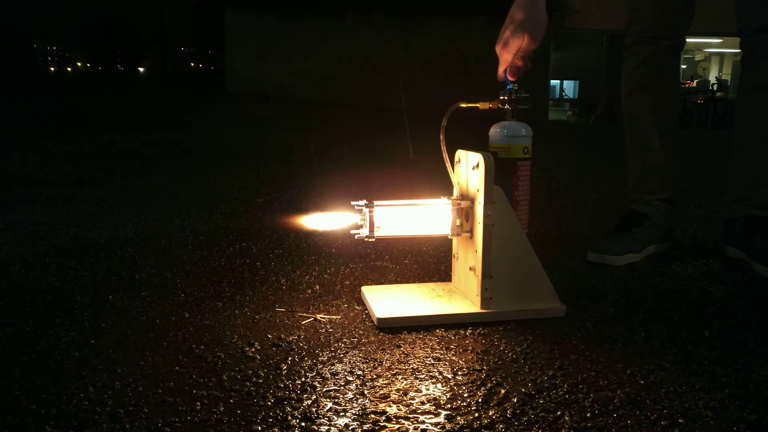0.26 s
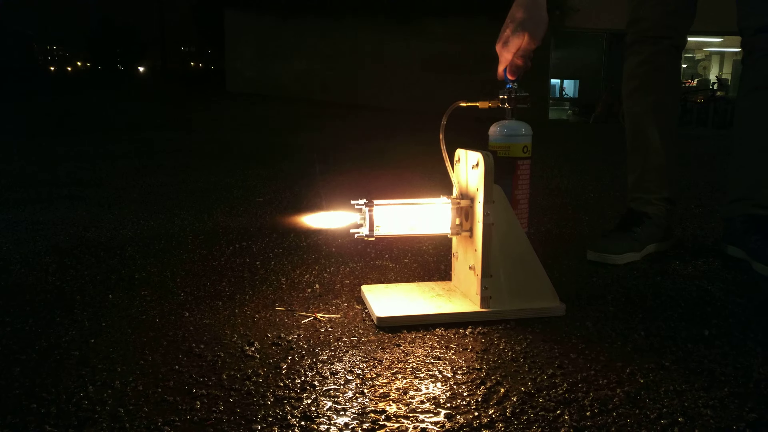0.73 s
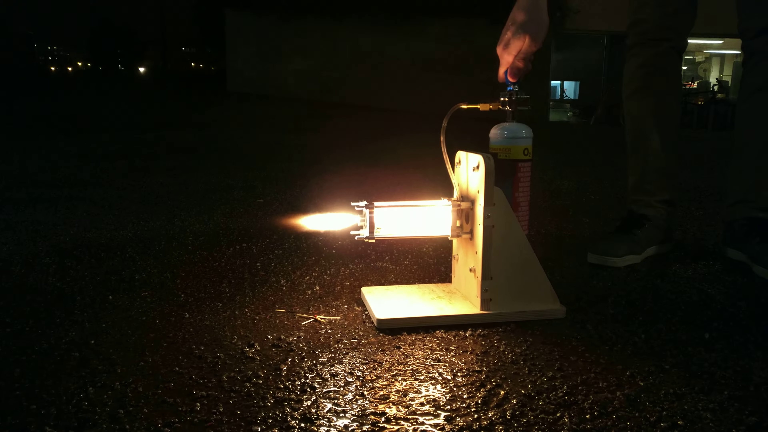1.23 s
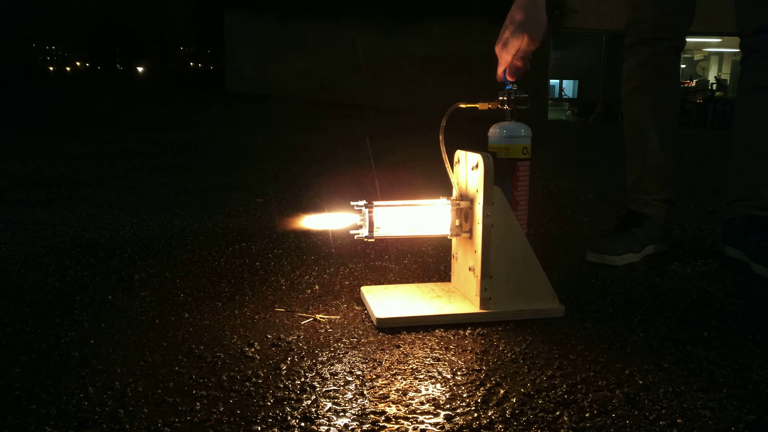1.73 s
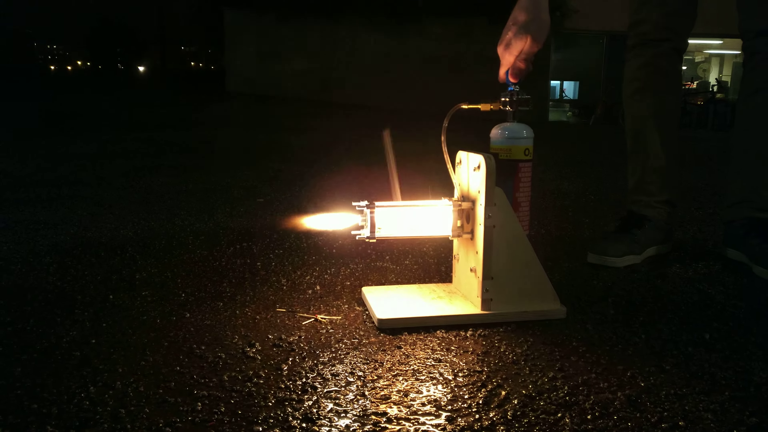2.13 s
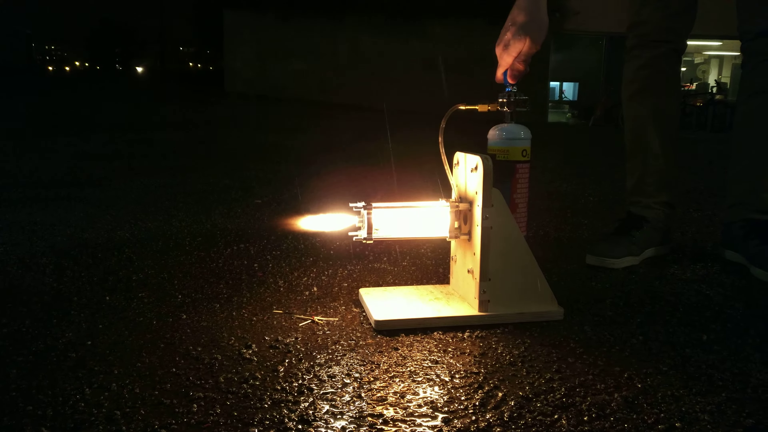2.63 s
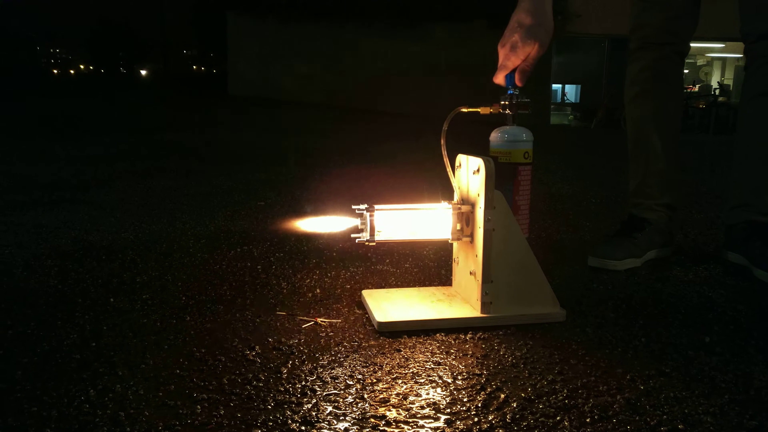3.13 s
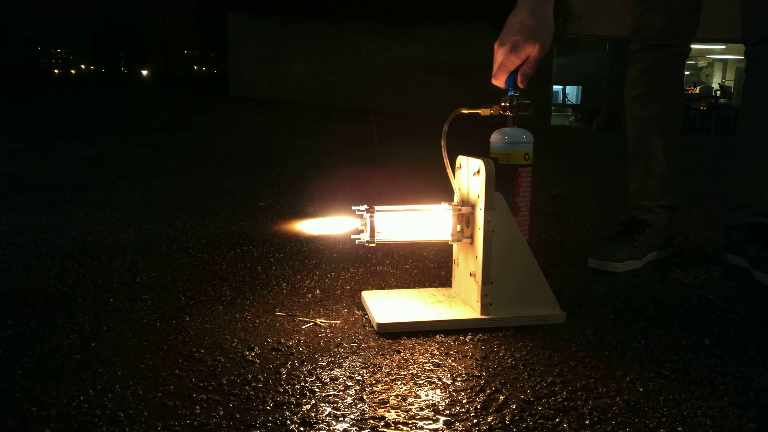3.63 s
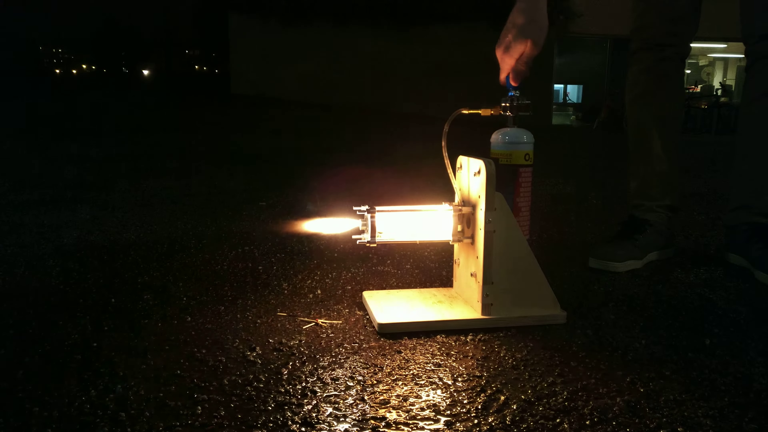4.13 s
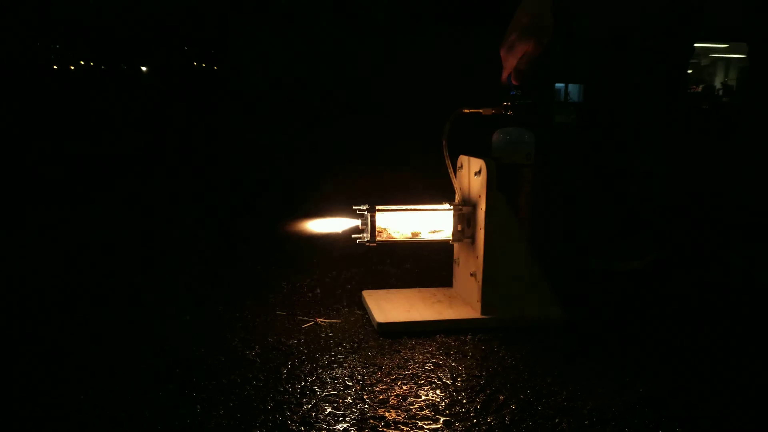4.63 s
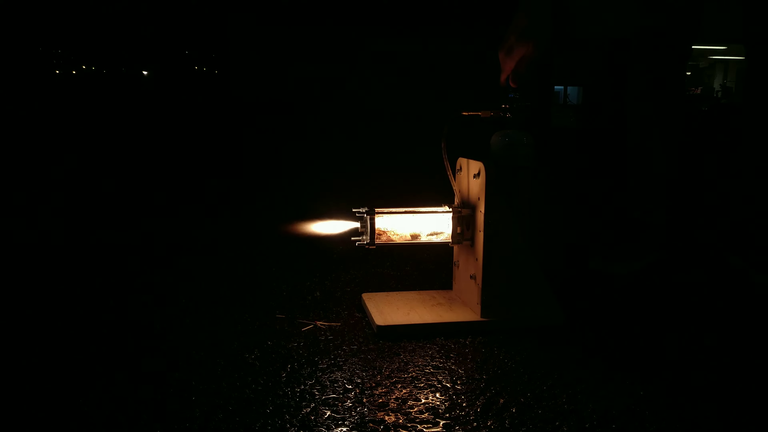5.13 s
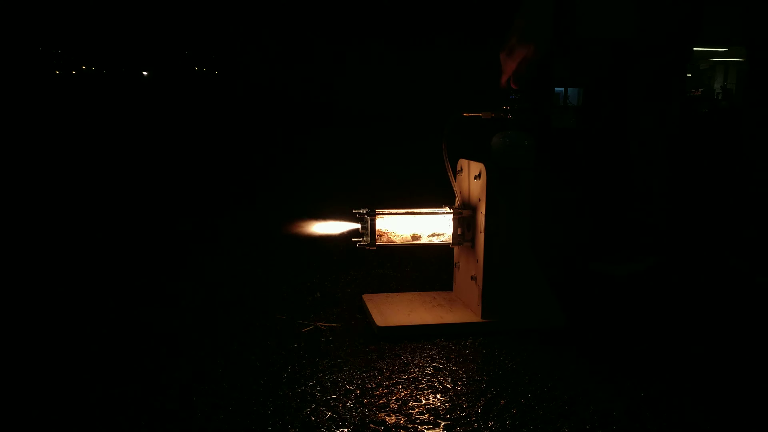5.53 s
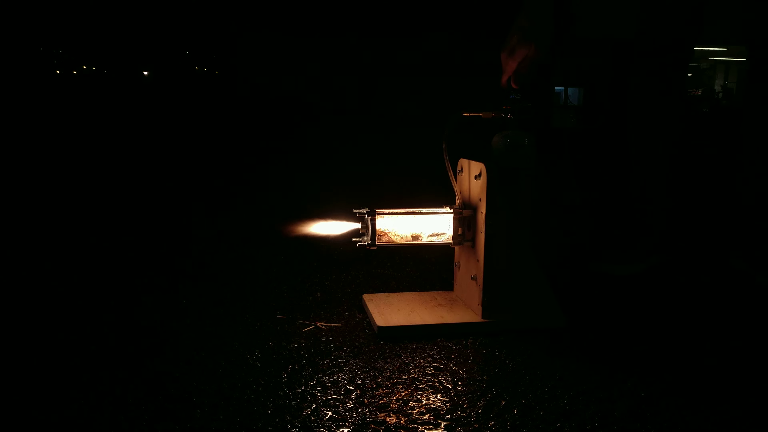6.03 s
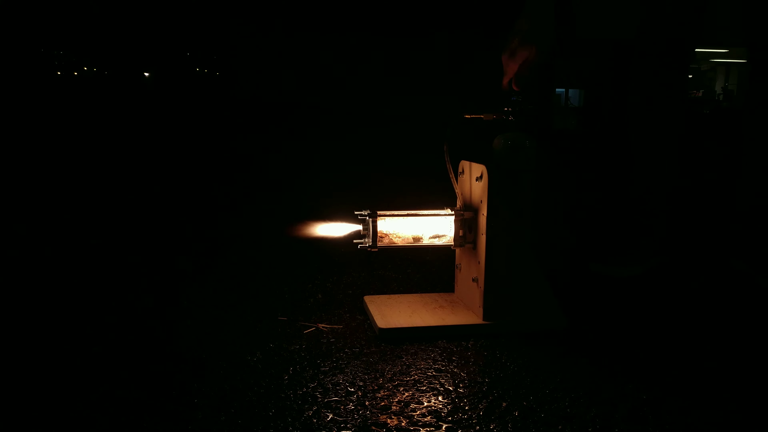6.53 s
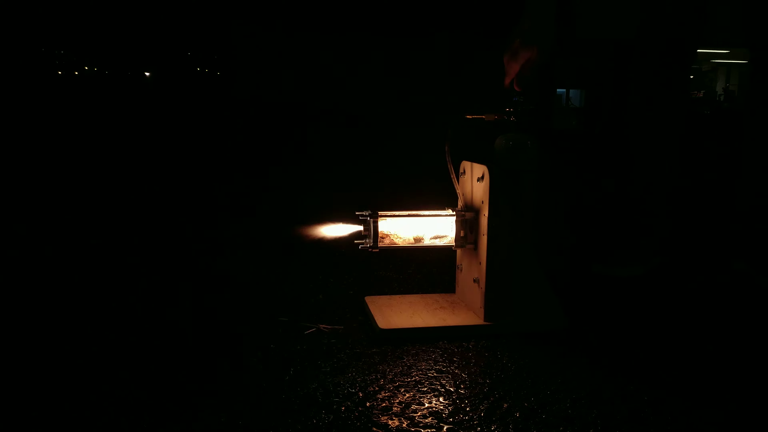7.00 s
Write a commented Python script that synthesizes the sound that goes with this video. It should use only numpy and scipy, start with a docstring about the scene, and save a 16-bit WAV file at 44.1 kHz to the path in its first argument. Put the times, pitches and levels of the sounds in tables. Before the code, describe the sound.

Close, loud, harsh hiss and flame roar from a small nozzle, with sharp thumping pops growing frequent and brief flame dropouts near the end.

```python
"""Gas hiss and flame roar come first; then the flame pops, more and more often, and briefly blows out.
A small hybrid rocket motor burns on a stand over wet asphalt, close to a stereo microphone.
Hiss, roar and a shrill band are shaped noise; pops are pressure spikes with puffs and low thumps.
The ground returns a late copy of the jet, which cuts evenly spaced notches into it.
A low machine hum lies behind."""
import sys
import numpy as np
from scipy import signal
from scipy.fft import rfft, irfft
from scipy.io import wavfile
from scipy.ndimage import uniform_filter1d, map_coordinates

SR = 44100
rng = np.random.default_rng(int(sys.argv[2]) if len(sys.argv) > 2 else 0)


def output_pcm(signal):
    """Save a mono or channel-first signal as 16-bit PCM at the path in sys.argv[1].

    Samples are clipped to [-1, 1] before scaling.
    """
    pcm = np.clip(np.atleast_2d(signal).T, -1, 1) * 32767
    wavfile.write(sys.argv[1], SR, np.round(pcm).astype(np.int16))


N = 320166
TIME = np.arange(N) / SR  # s
FREQ = np.maximum(np.arange(N // 2 + 1) * SR / N, 1)  # Hz

# a machine hums somewhere nearby: (multiple of its speed, mean level [dB rms])
HUM_TONES = [(1, -42.5), (2, -45), (3, -45.5)]
HUM_HZ = 48.5
# narrow peaks and dips in the jet's colour:
# (centre [Hz], width before a lower limit [Hz], left [dB], right [dB])
JET_PEAKS_AND_DIPS = [(388, 103, -9.5, -7), (612, 78, -3, -7.5), (1084, 99, 4.5, 5), (1749, 102, -7.5, 1),
                      (1980, 120, -7, -12.5), (2235, 170, 5.5, 3.5), (2404, 100, -7, -1.5),
                      (2543, 88, 4.5, 2.5), (3186, 78, -8.5, -6.5), (3450, 150, 1.5, 5.5),
                      (3943, 210, -6.5, -15), (4070, 150, 6, 6.5), (4840, 190, 4.5, -6),
                      (5180, 100, -9.5, -6), (5350, 110, 8.5, 6.5), (5506, 100, -12.5, -11),
                      (5646, 110, 7.5, 6.5), (6530, 110, -7.5, -14), (6640, 140, 5, 3.5),
                      (6885, 173, -9.5, -8), (7020, 130, 6, 8.5), (7380, 260, -26, -35),
                      (9200, 380, -11.5, 5.5)]
# the echo's path shifts as the flame wanders:
# (time [s], mean first notch [Hz], echo's share of the direct sound [0-1])
GROUND_PATH = [(0, 1490, .85), (.4, 1522, .88), (5, 1508, .86), (5.95, 1486, .82), (6.04, 1434, .72),
               (6.8, 1440, .72), (7.0, 1482, .76)]
# the notches waver: typical share of their frequency, changes per s
NOTCH_WAVER, NOTCH_WAVER_RATE = .005, 14
# how alike left and right are: (frequency [Hz], correlation [0-1], phase by which left leads [rad])
STEREO_LIKENESS = [(99, 0.92, 0), (616, 0.98, 0.57), (870, 0.64, 0), (1190, 0.86, -0.9), (1500, 0, -1.5),
                   (1710, 0.85, -3), (1835, 1, -3), (2110, 1, -3), (2276, 0.6, -2), (3000, 0.86, -1.3),
                   (3500, 0.52, -1.25), (4670, 0.45, -2), (5000, 0.56, -3.5), (6520, 0.2, -4),
                   (7220, 0.87, -6), (7000, 1, -1), (7670, 1, 3), (7930, 1, -6), (8570, 0.9, -6),
                   (9200, 0, -5), (10800, 0.5, -6), (13200, 0.3, -5), (14300, 1, -8.5)]
# gas hiss before these peaks and dips and gain: (frequency [Hz], left [dB per Hz], right [dB per Hz])
HISS_SPECTRUM = [(300.0, -67, -67), (1410, -68, -68.5), (2580, -72.5, -68.5), (4700, -58, -74.5),
                 (5730, -65, -74), (7530, -65, -64), (8250, -65.5, -67.5), (9830, -62.5, -62),
                 (10260, -56, -57.5), (11100, -63, -51.5), (12400, -68, -55), (13400, -55, -50),
                 (14900, -75, -57), (16200, -63, -51.5)]
HISS_LOW_HZ = 1500
# flame roar before these peaks and dips, bass blending and gain:
# (frequency [Hz], left [dB per Hz], right [dB per Hz])
ROAR_SPECTRUM = [(99, -62.5, -62), (308, -60, -62.5), (547, -57.5, -61.5), (930, -63.5, -76),
                 (1290, -60, -74), (1680, -51, -65.5), (2044, -63.5, -61), (3040, -58, -59),
                 (3690, -56.5, -65.5), (4460, -52, -64.5), (5690, -63.5, -65), (8000, -59.5, -56.5)]
# the flame blows out and relights: (start [s], end [s], full depth of the dip in the roar [dB])
FLAME_BLOWOUTS = [(4.082, 4.118, 22), (4.504, 4.527, 15), (4.856, 4.886, 16), (5.736, 5.759, 16),
                  (5.766, 5.787, 12), (6.878, 6.946, 13), (6.96, 6.994, 15), (7.009, 7.047, 17),
                  (7.055, 7.078, 16), (7.095, 7.115, 10)]
BLOWOUT_FADE_S = .006
# the flame pops, alone, in sputtering runs and at relights:
# (time [s], base strength [dB], how long it chokes beforehand [s])
FLAME_POPS = [(.2121, -20, 0.0041), (.9546, -15, 0.0044), (1.3166, -17, 0.0031), (1.6932, -17, 0.0041),
              (1.9141, -10, 0.0019), (1.9232, -14, 0.0028), (1.9297, -18, 0.00079), (1.9575, -21, 0.016),
              (1.9657, -18, 0.0037), (1.9851, -17.5, .004), (2.4289, -17.5, 0.011), (2.4343, -19, 0.0053),
              (2.5911, -18, 0), (2.7059, -18, 0.00049), (2.8212, -13, 0), (2.8298, -17, 0),
              (2.8486, -15, 0.0026), (2.8718, -20, 0), (2.9351, -17, 0), (3.064, -19, 0),
              (3.0737, -15, 0.0011), (3.0842, -18, .004), (3.1339, -18, 0.0063), (3.1491, -18, 0.0073),
              (3.1885, -21, 0.0034), (3.2083, -16, 0), (3.2912, -15, .004), (3.3934, -17.5, 0.0069),
              (3.4632, -19, 0.0073), (3.8388, -17, 0), (3.8577, -17, 0.013), (4.0768, -19.5, 0.016),
              (4.1191, -18, 0.0097), (4.1737, -20.5, .011), (4.1845, -21, 0.0049), (4.3953, -23, 0.0086),
              (4.4135, -19.5, 0.0086), (4.4193, -23, 0), (4.5278, -19, 0.016), (4.8441, -17.5, 0.0032),
              (4.8869, -16, 0.0057), (4.8972, -18, 0.0016), (4.9088, -22, 0.0013), (5.0032, -15, 0.0075),
              (5.0245, -20, 0.007), (5.0309, -17, 0), (5.0515, -18, 0), (5.113, -19, 0.0043),
              (5.1758, -19, 0.018), (5.1907, -14, .007), (5.1993, -23, 0.0061), (5.2234, -14, 0.0052),
              (5.2619, -18, 0), (5.2966, -19, 0.0094), (5.3244, -12, 0), (5.3497, -17, 0),
              (5.3853, -14, 0.0039), (5.4046, -22, 0), (5.4209, -21, 0.012), (5.5554, -15, 0.012),
              (5.676, -22, 0.0069), (5.6897, -18, 0.0037), (5.7119, -20, 0.004), (5.734, -19, .004),
              (5.7604, -18.5, 0), (5.7884, -14, 0), (5.8015, -16, .004), (5.8442, -17.5, 0.0086),
              (5.8994, -18, 0.002), (5.9262, -21, 0), (5.9447, -18, 0.013), (6.0194, -22, 0.0052),
              (6.1731, -26, 0.0037), (6.3575, -18, 0), (6.3692, -21, .004), (6.4168, -19, .013),
              (6.56, -16, .007), (6.5709, -16, 0), (6.7623, -18, 0), (6.7729, -20, 0.0047),
              (6.8768, -21, 0), (6.8944, -15, 0), (6.9465, -13, 0), (6.9554, -16, 0.0021), (6.9959, -14, 0),
              (7.0064, -21, 0), (7.0484, -19, 0.0063), (7.0793, -14, 0.0011), (7.094, -23, 0.0032),
              (7.1157, -16, 0.00088), (7.1364, -17, .004), (7.1827, -18, .007), (7.2068, -16, 0.0049),
              (7.2345, -22, 0.017), (7.2532, -17, 0.014)]
# the roar fades towards this sag before each pop, starting this long before the choke
POP_SAG_DB, POP_SAG_S = 4.5, 0.0032
# sharp spike: level above the pop's strength (dB), width (s), undershoot as a share of the spike
SPIKE_DB, SPIKE_S, SPIKE_UNDERSHOOT = 9.5, .0006, .27
# pressures where the spikes and the low body flatten
SPIKE_CEILING, POP_CEILING = .38, .18
# thump behind the spike: level above the pop's strength (dB), decay (s)
THUMP_DB, THUMP_DECAY_S = 7.5, .0105
# each thump starts higher and settles; the whole sweep is scaled at random over this ratio
THUMP_RISE_HZ, THUMP_SETTLE_S, THUMP_SPREAD = 109, 0.0069, 1.64
# the gas valve is opened further: start and length of the turn (s)
VALVE_TURN_S, VALVE_TAKES_S = 2.37, 0.64
# gains before the turn and what the turn adds (dB)
HISS_DB, HISS_GAIN_DB = -1.03, 1
ROAR_DB, ROAR_GAIN_DB = -1.5, 2
SHRILL_DB = -27  # with the valve open
# the burn falters towards the end: from when (s), how fast roar and shrill band sink (dB per s)
FALTER_S, ROAR_SAG_DB_PER_S, SHRILL_SAG_DB_PER_S = 6.8, 0.5, 32
TOP_HZ = 15700  # upper edge of the microphone's range


def amp(db):
    """Decibels to gain."""
    return 10 ** (np.asarray(db) / 20)


def colour(table):
    """The columns of a spectrum table at every frequency, interpolated over log frequency."""
    hz, *columns = np.transpose(table)
    return np.array([np.interp(np.log(FREQ), np.log(hz), column) for column in columns])


def filtered(x, hz, kind, order=2):
    """Butterworth filter."""
    return signal.sosfilt(signal.butter(order, hz, kind, fs=SR, output="sos"), x)


def level_off(x, ceiling, order=4):
    """Small swings pass nearly unchanged; large ones flatten towards the ceiling."""
    return x / (1 + (x / ceiling) ** order) ** (1 / order)


def walk(rate):
    """Random levels held 1 / rate s and slewed twice; spread near 1."""
    hold = int(SR / rate)
    steps = np.repeat(rng.standard_normal(N // hold + 1), hold)
    return 1.49 * uniform_filter1d(uniform_filter1d(steps, hold), hold)[:N]


def shimmer(x, depth=0.15, rate=9, shortest_s=.002, longest_s=.011, count=6):
    """Faint late copies swell and fade, so the fine colour of the jet keeps shifting."""
    copies = 0
    for lag_s in rng.uniform(shortest_s, longest_s, count):
        copies = copies + depth * walk(rate) * np.roll(x, int(lag_s * SR), axis=1)
    return x + copies


def turbulence(density_db):
    """Noise partly shared by left and right, with a phase lag."""
    alike, phase = colour(STEREO_LIKENESS)
    alike = np.clip(alike, 0, 1)
    shared, own = rfft(rng.standard_normal((2, N)))
    left = (alike * shared + np.sqrt(1 - alike ** 2) * own) * np.exp(1j * phase)
    return irfft(np.array([left, shared]) * amp(density_db) * np.sqrt(SR / 2), N)


def machine_hum(wander_db=1, wander_rate=3.3):
    """Low tones at multiples of the machine's speed, the same left and right, wander in level."""
    hum = 0
    for multiple, db in HUM_TONES:
        level = np.sqrt(2) * amp(db + wander_db * walk(wander_rate))  # rms to peak
        hum = hum + level * np.sin(2 * np.pi * (multiple * HUM_HZ * TIME + rng.random()))
    return hum


def ground_echo(x):
    """The wet asphalt returns the jet half a period of the first notch later."""
    s, hz, share = np.transpose(GROUND_PATH)
    notch_hz = np.interp(TIME, s, hz) * (1 + NOTCH_WAVER * walk(NOTCH_WAVER_RATE))
    place = np.arange(N) - SR / (2 * notch_hz)
    # read between samples, so the delay can glide
    echo = np.array([map_coordinates(side, [place], order=5, mode="nearest") for side in x])
    return x + np.interp(TIME, s, share) * echo


def jet_colour(narrowest_hz=100):
    """Narrow peaks and dips in the jet's colour, left and right, in dB."""
    total_db = 0
    for hz, width, *peak_db in JET_PEAKS_AND_DIPS:
        bell = 1 / (1 + (2 * (FREQ - hz) / max(width, narrowest_hz)) ** 2)
        total_db = total_db + np.outer(peak_db, bell)
    return total_db


def nozzle_shrill(centre_hz=14650, width_hz=650, right_db=-2):
    """A shrill band of jet noise on top of the hiss, down 4 dB at width_hz either side."""
    band = turbulence(-((FREQ - centre_hz) / width_hz) ** 2 * 4)
    return band / np.std(band) * amp([[0], [right_db]])


def gas_hiss(waver_db=0.35, waver_rate=22):
    """The gas jet hisses on whether it burns or not; without the flame it has no body."""
    hiss = filtered(turbulence(colour(HISS_SPECTRUM) + jet_colour()), HISS_LOW_HZ, "high")
    return hiss * amp(waver_db * walk(waver_rate))


def flame_roar(pops, flutter_db=1.04, flutter_rate=45, top_hz=6600):
    """The burning plume roars and flutters; it sags before pops and collapses in blowouts."""
    density_db = colour(ROAR_SPECTRUM) + jet_colour()
    # long waves arrive equally loud left and right
    apart = np.minimum(FREQ / 450, 1) ** 2
    density_db = apart * density_db + (1 - apart) * density_db.mean(axis=0)
    sags = [(s - choke_s - POP_SAG_S, s, POP_SAG_DB) for s, db, choke_s in pops]
    dip_db = np.zeros(N)
    for start, end, depth in list(FLAME_BLOWOUTS) + sags:
        # the flame dies away and catches again at once
        fade = np.interp(TIME, [start, start + BLOWOUT_FADE_S], [0, 1])
        dip_db += depth * fade * (TIME < end)
    roar = shimmer(filtered(turbulence(density_db), top_hz, "low", order=6))
    return roar * amp(flutter_db * walk(flutter_rate) - dip_db)


def flame_pops(pops, thump_hz=58, thump_lag_s=0.00052, choke_hz=105, choke_db=2,
               puff_db=-3, puff_low_hz=135, puff_high_hz=270, puff_rise_s=0.0021, puff_decay_s=0.0058,
               body_top_hz=900, crackle_s=0.00452, crackle_share=0.21, crack_db=-2.0, shade_hz=600,
               rasp_db=-10, rasp_low_hz=450, rasp_high_hz=650, count=2):
    """A choke sags the pressure; unburnt gas ignites: spike, rasping puff, after-spikes and thump."""
    t = np.arange(-SR // 20, SR // 10) / SR
    after = np.maximum(t - thump_lag_s, 0)
    # a spike with a brief undershoot behind it
    spike = np.exp(-(2 * t / SPIKE_S) ** 2) - SPIKE_UNDERSHOOT * np.exp(-(t / SPIKE_S - 1) ** 2)
    # the thump slides down from its raised starting pitch
    slide = THUMP_RISE_HZ * THUMP_SETTLE_S * (1 - np.exp(-after / THUMP_SETTLE_S))
    cycles = thump_hz * after + slide
    spikes, thumps, swell = np.zeros((3, N + len(t)))
    draws = rng.random((len(pops), 1 + count))
    for (s, db, choke_s), (pitch, *gaps) in zip(pops, draws):
        start = int((s + t[0]) * SR)
        at = slice(start, start + len(t))
        # ever weaker spikes follow at uneven gaps of a few milliseconds
        lags_s = np.r_[0, np.cumsum(np.add(gaps, .5)) * crackle_s]
        for k, lag_s in enumerate(lags_s):
            share = crackle_share ** np.sqrt(k)
            spikes[at] += amp(db + SPIKE_DB) * share * np.roll(spike, int(lag_s * SR))
        # the pressure swings under after the spike, slows down and dies in a cycle or two
        swing = np.sin(2 * np.pi * cycles * THUMP_SPREAD ** (pitch - .5))
        thump = -amp(db + THUMP_DB) * swing * np.exp(-after / THUMP_DECAY_S)
        choke = -amp(db + choke_db) * np.sin(2 * np.pi * choke_hz * (t + choke_s))
        # each pop cuts short the swing of the one before
        before = np.where(t > -choke_s, choke, thumps[at])
        thumps[at] = np.where(t >= 0, thump, before)
        swell[at] += amp(db) * np.exp(np.minimum(t, 0) / puff_rise_s - after / puff_decay_s)
    puff = filtered(rng.standard_normal(N), [puff_low_hz, puff_high_hz], "band")
    rasp = filtered(rng.standard_normal(N), [rasp_low_hz, rasp_high_hz], "band")
    puffs = swell[:N] * amp(puff_db) * puff / np.std(puff)
    rasps = swell[:N] * amp(rasp_db) * rasp / np.std(rasp)
    body = level_off(thumps[:N] + puffs, POP_CEILING)
    crack = level_off(spikes[:N] + rasps, SPIKE_CEILING) * amp(crack_db)
    # the right side is shaded from the sharp spikes; the low body reaches both alike
    shaded = filtered(crack, shade_hz, "low", order=1)
    return np.array([crack, shaded]) + filtered(body, body_top_hz, "low")


def scene():
    """The jet over wet ground grows as the valve opens and sinks as the burn falters; hum and pops join."""
    valve = np.clip((TIME - VALVE_TURN_S) / VALVE_TAKES_S, 0, 1)
    faltering = np.maximum(TIME - FALTER_S, 0)
    hiss = shimmer(gas_hiss()) * amp(HISS_DB + HISS_GAIN_DB * valve)
    roar_db = ROAR_DB + ROAR_GAIN_DB * valve - ROAR_SAG_DB_PER_S * faltering
    roar = flame_roar(FLAME_POPS) * amp(roar_db)
    shrill = nozzle_shrill() * valve * amp(SHRILL_DB - SHRILL_SAG_DB_PER_S * faltering)
    return machine_hum() + ground_echo(hiss + roar + shrill) + flame_pops(FLAME_POPS)


def record(dry):
    """The microphone drops the deepest bass and rounds the highest peaks; the top is cut steeply."""
    sound = filtered(dry, 39.0, "high", order=4)
    sound = level_off(sound, .72, order=12)
    return signal.sosfilt(signal.ellip(12, .1, 80, TOP_HZ, fs=SR, output="sos"), sound)


dry = scene()
out = record(dry)
output_pcm(out)
```